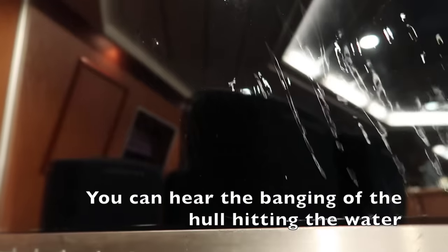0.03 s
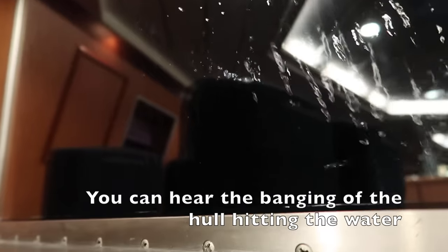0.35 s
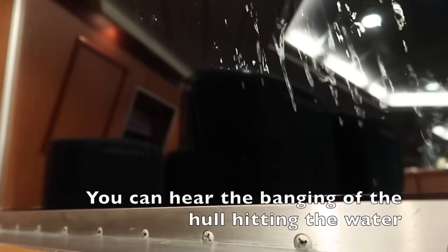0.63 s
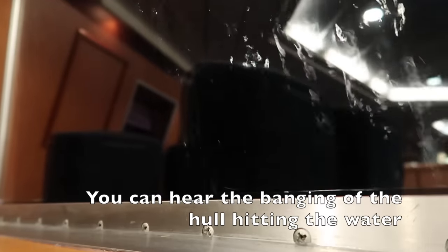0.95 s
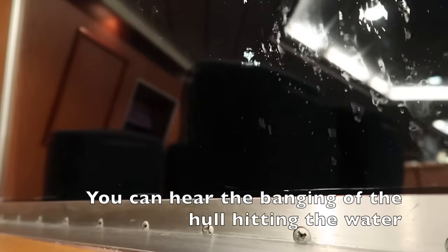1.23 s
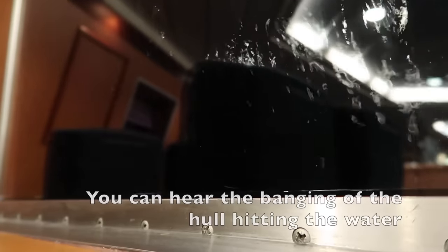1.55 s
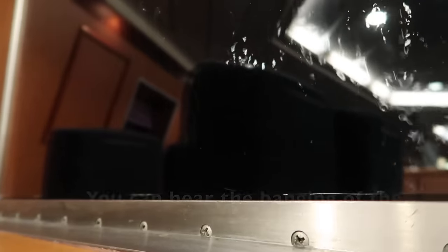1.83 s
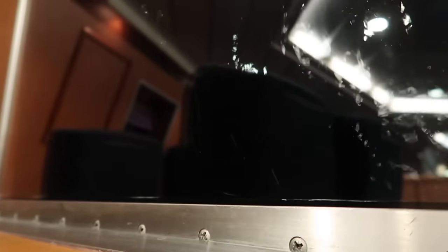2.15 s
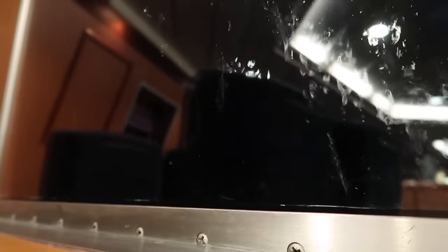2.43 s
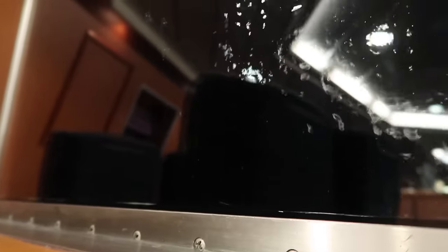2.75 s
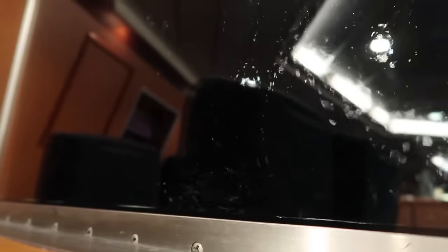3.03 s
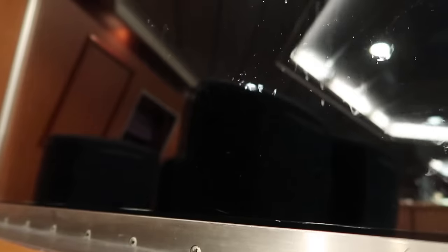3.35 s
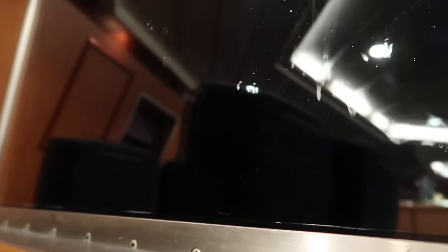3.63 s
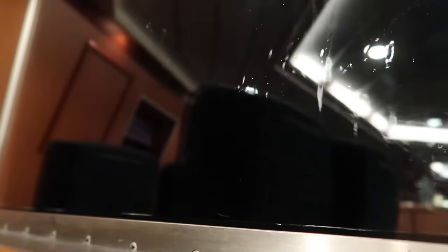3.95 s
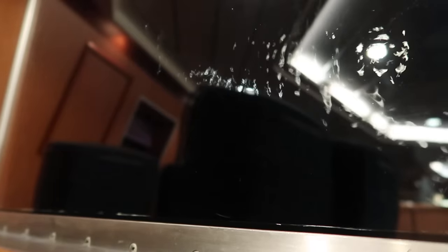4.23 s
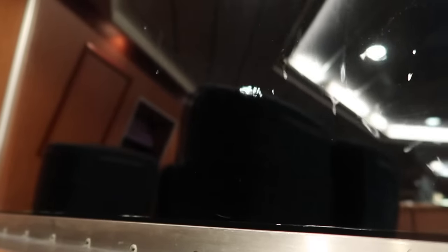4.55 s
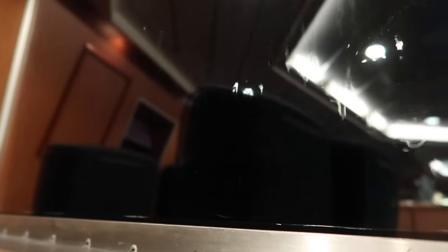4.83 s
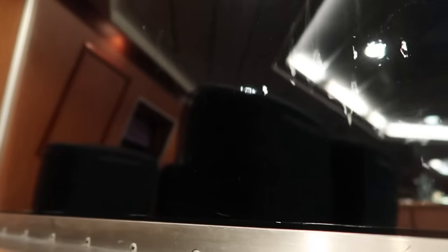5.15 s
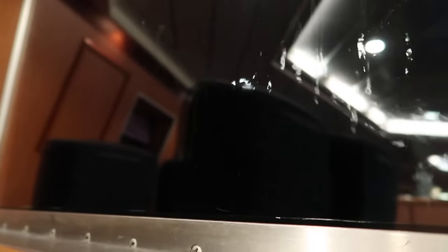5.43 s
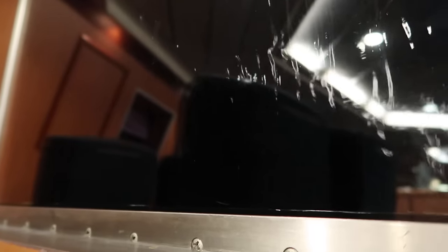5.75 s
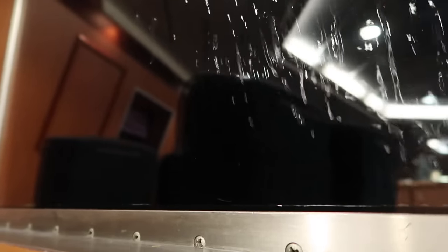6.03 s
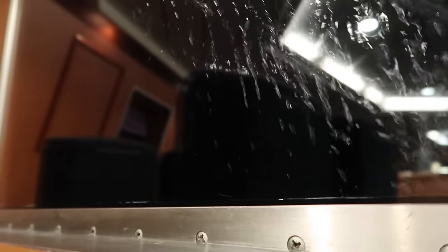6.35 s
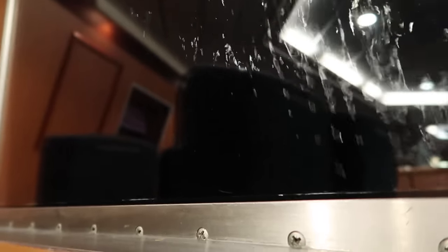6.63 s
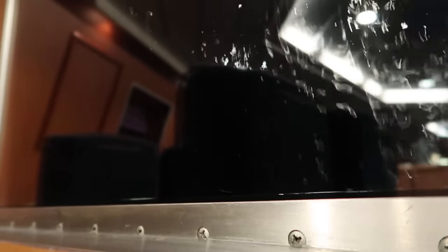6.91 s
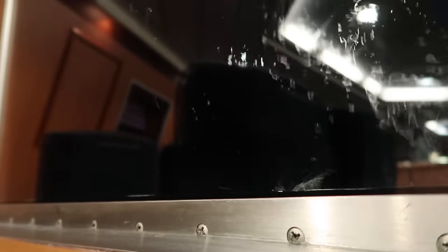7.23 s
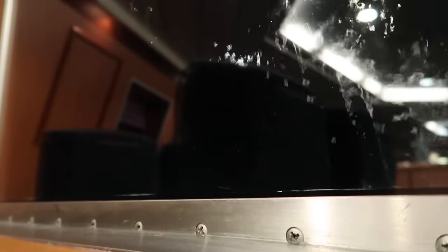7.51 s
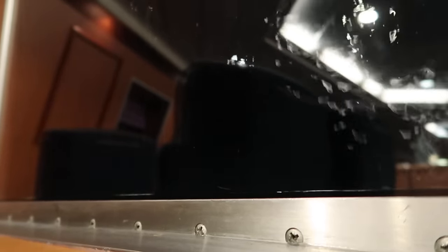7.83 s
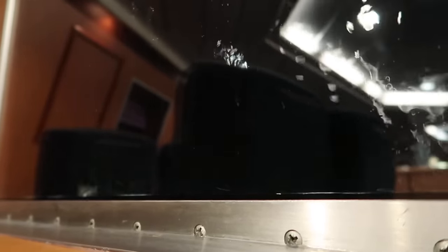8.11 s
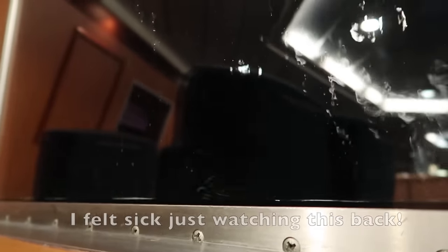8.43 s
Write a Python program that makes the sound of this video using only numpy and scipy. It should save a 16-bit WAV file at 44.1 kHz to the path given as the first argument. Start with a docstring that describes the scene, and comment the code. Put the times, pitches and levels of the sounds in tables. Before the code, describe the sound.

Inside a boat cabin in rough seas, the hull rumbles and booms heavily twice while panels tick and spray patters on glass.

```python
"""Boat cabin in a rough night sea

Turbulent water rushes along the hull and makes it rumble and drone. Twice the bow slams into a wave:
deep blows ring the hull's modes, the plating roars, the trim rattles, and the level steps up around
each slam. Joints tick, fittings knock and spray taps the glass over a hush and a faint high whine."""
import sys
import numpy as np
from scipy.fft import rfft, irfft, next_fast_len
from scipy.io import wavfile
from scipy.ndimage import uniform_filter1d, map_coordinates

SR = 44100
rng = np.random.default_rng(int(sys.argv[2]) if len(sys.argv) > 2 else 0)


def pcm_store(signal):
    """Save signal as 16-bit PCM."""
    levels = np.round(np.clip(np.atleast_2d(signal), -1, 1) * 32767)
    wavfile.write(sys.argv[1], SR, levels.astype(np.int16).T)


N = 373968
TIME = np.arange(N) / SR

# Waves that shake the hull. Each row: time in seconds, boom in dB, flexing in dB, rise in seconds.
WAVES = [(.57, -24.5, -18.5, 0.096), (.85, -34, -28.5, 0.079), (1.24, -28, -46.5, 0.066),
         (1.65, -29.5, -36.5, 0.23), (2.65, -32.5, -54.5, 0.15), (5.36, -35.5, -30, 0.12),
         (6.18, -29, -32.5, 0.079), (6.72, -20.5, -23.5, 0.021), (6.93, -33, -34, 0.11),
         (7.25, -23.5, -38, 0.045), (7.54, -21.5, -24.5, 0.2)]


def amp(db):
    """Amplitude grows tenfold with every 20 dB."""
    return np.exp(np.log(10) / 20 * np.asarray(db))


def together(*levels_db):
    """Incoherent sounds add in power; the sum is in dB."""
    return 10 * np.log10(sum(amp(2 * db) for db in levels_db))


def add(track, start_s, sound):
    """Superposition: a short sound adds to a track, both mono or both stereo."""
    part = track[..., round(start_s * SR):][..., :sound.shape[-1]]
    part += sound[..., :part.shape[-1]]


def wobble(rate):
    """Slow random modulation: a smooth curve through rate knots a second."""
    return map_coordinates(rng.standard_normal(int(N * rate / SR) + 4), [TIME * rate])


def filtered(x, response):
    """A linear filter multiplies the spectrum by its frequency response."""
    n = x.shape[-1]
    padded = next_fast_len(n + SR // 2)
    return irfft(rfft(x, padded) * response(np.fft.rfftfreq(padded, 1 / SR)), padded)[..., :n]


def shaped(points):
    """A spectral envelope joins (Hz, dB) points on a logarithmic frequency axis."""
    hz, db = np.transpose(points)
    return lambda f: amp(np.interp(np.log(f + 1), np.log(hz + 1), db))


def resonance(f, hz, width):
    """A damped oscillator responds most at its natural frequency, hz."""
    return 1j * f * width / (hz * hz - f * f + 1j * f * width)


def body(modes):
    """Modal summation: resonances add in alternating sign and roll off above the highest."""
    top_hz = 1.14 * max(hz for hz, _, _ in modes)

    def response(f):
        terms = ((-1) ** k * amp(db) * resonance(f, hz, width) for k, (hz, width, db) in enumerate(modes))
        return sum(terms) / np.sqrt(1 + (f / top_hz) ** 8)
    return response


def diffuse(response, width=None, size=N):
    """Partly coherent stereo noise, mid at rms 1; by default the bass is mono and the treble wide."""
    # The cabin's stereo width. Each row: frequency in Hz, side minus mid in dB.
    cabin_width = [(60, -103.5), (120, -78), (200, -62.5), (370, -21), (670, -22), (1230, -16.5),
                   (2240, -20), (4100, -5.5), (7500, 0), (12000, 11)]
    side_gain = shaped(width or cabin_width)
    mid = filtered(rng.standard_normal(size), response)
    side = filtered(rng.standard_normal(size), lambda f: response(f) * side_gain(f))
    return np.array([mid + side, mid - side]) / mid.std()


def steady(x, span_s):
    """Narrow-band noise swells by chance; dividing by its running rms evens out the slow swells."""
    window = int(span_s * SR)
    power = np.abs(uniform_filter1d(np.mean(x ** 2, axis=0), window))
    return x / np.sqrt(uniform_filter1d(power, window) + 1e-6)


def glide(x, ratio):
    """Reading a sound at a varying speed scales all its frequencies by that ratio."""
    return np.array([map_coordinates(ear, [np.cumsum(ratio)], mode="mirror") for ear in x])


def impacts(blows, modes, db_per_octave, attack_s):
    """Free vibration: each blow drives most the modes near its pitch, and they decay exponentially."""
    out, t = np.zeros(N), np.arange(SR) / SR
    hz, mode_db, t60 = np.transpose(modes)[:, :, None]
    rise = 1 - np.exp(-t / attack_s)
    for start_s, db, main_hz in blows:
        size, detune = rng.standard_normal((2, len(hz), 1))
        drive_db = mode_db + 1.7 * size - db_per_octave * np.abs(np.log2(hz / main_hz))
        rings = amp(drive_db - 60 * t / t60) * np.sin(2 * np.pi * hz * (1 + 0.012 * detune) * t)
        add(out, start_s, amp(db) * rise * rings.sum(0))
    return out


def tap(hz, life_cycles):
    """A small contact rings as a damped sinusoid, in its own phase at each ear."""
    t = np.arange(SR // 40) / SR
    phase = rng.random() + 0.11 * rng.standard_normal((2, 1))
    envelope = np.exp(-t * hz / life_cycles) * (1 - np.exp(-t * hz))
    return envelope * np.sin(2 * np.pi * (hz * t + phase))


def patter(bursts, hz, spread_octaves, spread_db, life_cycles, count):
    """Taps with exponentially distributed delays make bursts that thin out."""
    out = np.zeros((2, N))
    for start_s, db, mean_delay_s in bursts:
        delays = mean_delay_s * rng.exponential(size=count)
        scatter = np.clip(rng.standard_normal((count, 2)), -2, 2)
        for delay, (pitch, size) in zip(delays, scatter):
            contact = tap(hz * 2 ** (spread_octaves * pitch), life_cycles)
            add(out, start_s + delay, amp(db + spread_db * size) * contact)
    return out


def swell(peak_s, db, half_s):
    """A Gaussian swell is a parabola in dB."""
    return db - 20 / np.log(10) * np.minimum(((TIME - peak_s) / half_s) ** 2, 20)


def shudder(peak_s, db, rise_s, fade_db_per_s, linger_db, linger_db_per_s):
    """Double-slope decay, in dB: after a quick rise the shaking fades and a weaker part lingers."""
    age = np.maximum(TIME - peak_s, 0)
    rise_db = np.where(TIME < peak_s, swell(peak_s, db, rise_s), db)
    return rise_db + together(-fade_db_per_s * age, linger_db - linger_db_per_s * age)


def flow_level(usual_db, slope):
    """Flow noise grows with the water's speed, by slope dB for each dB of flow."""
    # Flow along the hull. Each row: time in seconds, strength about its usual value in dB.
    flow = [(0.0, -1.5), (0.7, -1.5), (1.1, 1), (1.4, 5), (1.85, 4), (2.15, 1), (3.0, 2.5), (3.5, 1.1),
            (4.0, 2), (4.65, -1.5), (5.15, -5), (5.75, -2), (6.4, 0.5), (7.15, -3), (7.55, -2), (8.05, 2),
            (8.48, 3.5)]
    return usual_db + slope * np.interp(TIME, *np.transpose(flow))


def strain_level(over_db=0, lag=0, stretch=1):
    """Response in dB to the strain of the bow digging in, delayed by lag half-lengths."""
    # Plunges of the bow. Each row: peak time in seconds, strain in dB, half-length in seconds.
    plunges = [(0.483, -34.5, 0.061), (1.543, -36.5, 0.078), (6.691, -27.5, 0.133), (6.898, -33, 0.052)]
    return together(*[swell(s + lag * half_s, db + over_db, stretch * half_s) for s, db, half_s in plunges])


def boom_level(idle_db=-33.5):
    """The shudders of the waves add in power to a constant rumble; the level is in dB."""
    shudders = [shudder(s, db, rise_s, fade_db_per_s=13.8, linger_db=-9.5, linger_db_per_s=5.4)
                for s, db, _, rise_s in WAVES]
    return together(idle_db, *shudders)


def spray_level():
    """Showers add in power to the spray that the flow throws up; the level is in dB."""
    # Showers on the windows. Each row: peak time in seconds, level in dB, half-length in seconds.
    showers = [(0.515, -56, 0.067), (0.794, -61, 0.21), (2.26, -63.5, 0.35), (2.833, -59, 0.17),
               (3.217, -64.5, 0.21), (4.04, -59.5, 0.098), (5.414, -64, 0.098), (6.073, -60, 0.37),
               (6.84, -58, 0.36), (7.26, -56.5, 0.055), (7.613, -56, 0.54), (8.06, -56, 0.21),
               (8.382, -51.5, 0.29)]
    return together(flow_level(-66.5, slope=0.52), *[swell(*shower) for shower in showers])


def hull_flexing(idle_db=-42.5):
    """Turbulent pressure bends the hull at very low frequencies, most after each wave."""
    # Bending spectrum. Each row: frequency in Hz, relative density in dB.
    spectrum = [(4, -42.5), (14, -2), (24, -4.5), (31, 1), (39, 3), (55, -27.5), (150, -120)]
    shudders = [shudder(s, db, rise_s, fade_db_per_s=43, linger_db=-19.5, linger_db_per_s=4)
                for s, _, db, rise_s in WAVES]
    return amp(together(idle_db, *shudders)) * steady(diffuse(shaped(spectrum)), span_s=0.11)


def cabin_boom(mode_hz=56, width_hz=6, mode_db=-5):
    """The hull booms into the cabin, whose lowest air mode picks out one deep note by resonance."""
    # Boom spectrum. Each row: frequency in Hz, relative density in dB.
    spectrum = [(8, -85), (22, -26.5), (32, -7), (44, 4), (55, 5.5), (68, 7), (92, 5), (115, 3.5),
                (135, -12.5), (190, -35), (400, -120)]
    boom = steady(diffuse(shaped(spectrum)), span_s=0.079)
    note = steady(diffuse(lambda f: resonance(f, mode_hz, width_hz) ** 2), span_s=0.6)
    return amp(boom_level()) * (boom + amp(mode_db) * note)


def plating():
    """Forced vibration: flow, strain and boom drive the plating into a roar."""
    # Modes of plating and cabin panels. Each row: frequency in Hz, bandwidth in Hz, gain in dB.
    modes = [(136.8, 23.4, -0.5), (165.8, 13.4, 2.5), (197, 13.3, -6), (220, 23.4, -4.5), (282, 35, -12),
             (314, 15.7, -11.5), (335.6, 7.3, -8), (381, 13.2, -14.5)]
    level_db = together(flow_level(-35, slope=0.74), strain_level(2.7, lag=0.49), boom_level() - 17)
    return amp(level_db) * steady(diffuse(body(modes)), span_s=0.18)


def hull_drone(wander=0.02):
    """The flow excites hollow resonances of the hull, which wander in pitch."""
    # Hollow modes. Each row: frequency in Hz, bandwidth in Hz, gain in dB.
    modes = [(284.3, 16.6, -1), (337.6, 11.8, -2.5), (378, 9.4, -3.5), (455.6, 14, -8.5), (478.3, 8.2, -3),
             (531, 100, -15)]
    drone = glide(diffuse(body(modes)), 1 + wander * wobble(2.5))
    return amp(flow_level(-46.5, slope=1.87)) * steady(drone, span_s=0.28)


def water(roof_db=4):
    """Modulated noise: wash churns along the hull; spray drums on the roof and hisses on the windows."""
    # Spectra of wash and spray. Each row: frequency in Hz, relative density in dB.
    wash_spectrum = [(60, -62.5), (220, -21), (340, -2.5), (415, 3.5), (475, 5.5), (550, -0.5), (590, 3.5),
                     (800, 2.5), (1000, -1), (1130, -2), (1320, -19), (1600, -15.5), (2050, -14),
                     (2600, -20), (2950, -38.5), (5000, -67.5)]
    spray_spectrum = [(200, -63), (700, -9.5), (1300, -1.5), (2100, 4.5), (2600, 2), (2950, -1),
                      (4500, -10.5), (7000, -19.5), (11000, -35.5), (14500, -44)]
    spray_db = spray_level()
    surge_db = strain_level(-14, lag=0.7, stretch=0.67)
    wash_db = together(flow_level(-49, slope=0.98), surge_db, spray_db + roof_db)
    churn = wobble(22)
    wash = amp(wash_db + 0.94 * churn + 1.2 * wobble(60)) * diffuse(shaped(wash_spectrum))
    spray = amp(spray_db + churn + 1.5 * wobble(70)) * diffuse(shaped(spray_spectrum))
    return wash + spray


def air(level_db=-59):
    """A diffuse field: an even hush arrives from all sides."""
    # Spectrum of the cabin air. Each row: frequency in Hz, relative density in dB.
    spectrum = [(70, -59.5), (125, -19), (180, -19.5), (300, 4.5), (500, 0), (1000, -7), (1400, -6),
                (2000, -11), (4000, -15), (7000, -21.5), (12000, -29.5), (14500, -40)]
    # Its stereo width. Each row: frequency in Hz, side minus mid in dB.
    width = [(200, -1.5), (3000, 2), (7500, 0.5), (12000, 6)]
    return amp(level_db) * diffuse(shaped(spectrum), width)


def whine(level_db=-82, tones_hz=(13000, 13025)):
    """Two close electronic tones waver and beat, a quarter cycle apart at the two ears."""
    phase = 2 * np.pi * np.outer(tones_hz, TIME) + 0.8 * np.array([wobble(35), wobble(35)])
    return amp(level_db + wobble(8)) * np.array([np.sin(phase).sum(0), np.cos(phase).sum(0)])


def drops(over_spray_db=-4, spread_db=11, centre_hz=2700, count=600):
    """Random impacts: drops tap the glass, each at its own pitch, harder in the showers."""
    out, spray_db = np.zeros((2, N)), spray_level()
    for place, size, pitch in rng.random((count, 3)):
        at, hz = int(place * (N - 1)), centre_hz * 2 ** (2 * pitch - 1)
        drop_db = spray_db[at] + over_spray_db + spread_db * size ** 4
        add(out, at / SR, amp(drop_db) * tap(hz, life_cycles=5))
    return out


def hull_groan(pitch_rise=0.07):
    """Narrow resonances sing as the bow digs in, their pitch rising with the strain."""
    # Groaning modes. Each row: nominal frequency in Hz, bandwidth in Hz, gain in dB.
    modes = [(187.3, 3.8, 9.5), (215, 47, 2), (306.2, 12.3, 6), (370, 21, -2.5), (429, 27, -8),
             (482, 26, -9.5), (587, 43, -11), (770, 90, -22)]
    strain = amp(strain_level())
    pitch = 1 + pitch_rise * (strain / strain.max() - 0.7)
    return strain * steady(glide(diffuse(body(modes)), pitch), span_s=0.29)


def wave_blows():
    """Impulse excitation: each blow of a wave on the bottom rings the hull's modes."""
    # Blows. Each row: start in seconds, relative level in dB, most strongly driven pitch in Hz.
    blows = [(.452, -8.5, 110), (.51, -16, 150), (0.538, -6.5, 75), (0.59, -12, 35), (0.62, -16, 50),
             (0.689, -14.5, 70), (0.794, -8.5, 58.2), (.88, -15, 64.5), (1.03, -16.5, 91),
             (4.255, -15, 112), (6.154, -15, 56.5), (6.529, -15, 75), (6.697, -4, 65), (6.735, -10, 69.4),
             (6.789, -8, 60), (6.831, -7, 65), (6.887, -6.5, 112.4), (7.007, -5.5, 90), (7.222, -6.5, 80.4)]
    # Hull modes. Each row: frequency in Hz, gain in dB, T60 in seconds.
    modes = [(16.5, 8, 0.25), (30, -11, .35), (55, -3.5, 0.49), (85.6, 6, 0.24), (119.8, -25.5, 0.34),
             (170.7, -5.5, 0.22), (189.5, -16, 0.98), (314, -40, 0.39)]
    return amp(-9) * impacts(blows, modes, db_per_octave=5, attack_s=0.0051)


def knocks_and_fizz(attack_s=0.0039):
    """Decaying noise bands: most are resonances of loose fittings that knock and squeak;
    the two above 10 kHz during the first slam are a faint, brief high fizz."""
    # Each row: start in seconds, level in dB, centre in Hz, bandwidth in Hz, T60 in seconds.
    bursts = [(0.464, -31, 870, 478, 0.065), (0.484, -55, 2530, 2520, 0.3),
              (0.487, -63.5, 10200, 2520, 0.11), (0.59, -65, 11000, 4000, .08),
              (0.522, -33, 810, 455, 0.062), (0.683, -47, 2200, 1200, .04), (1.304, -48.5, 1670, 900, 0.13),
              (2.624, -49.5, 4700, 2600, 0.034), (5.916, -55, 5000, 500, 0.091),
              (4.407, -58.5, 11400, 1190, 0.089), (4.41, -51.5, 6160, 3000, 0.13),
              (4.427, -49.5, 2880, 1200, .2), (4.436, -41.5, 1700, 600, 0.25), (4.432, -41, 945, 596, 0.24),
              (5.81, -49, 2290, 900, 0.11), (6.113, -31, 900, 220, 0.062), (6.119, -53, 5300, 200, 0.06),
              (6.755, -43.5, 2780, 800, 0.075), (6.837, -38, 2180, 904, 0.035)]
    out, t = np.zeros((2, N)), np.arange(SR // 2) / SR
    rise = 1 - np.exp(-t / attack_s)
    for start_s, db, hz, width, t60 in bursts:
        band = diffuse(lambda f: resonance(f, hz, width) ** 2, size=SR)[:, -len(t):]
        add(out, start_s, amp(db - 60 * t / t60) * rise * band)
    return out


def trim(room_db=-19, room_t60=0.45, ring_db=-23, chatter_db=-52, chatter_t60=0.04):
    """Panel joints snap and reverberate as the cabin works, chattering louder as the hull booms."""
    # Snaps. Each row: start in seconds, relative level in dB, T60 at the joint in seconds.
    snaps = [(0.4825, -46.5, .06), (0.494, -48.5, .05), (0.522, -44, 0.044), (0.538, -46, 0.035),
             (0.5896, -45, 0.079), (2.1, -43, 0.043), (2.257, -40, 0.046), (2.289, -39.5, .04),
             (2.3442, -38, 0.05), (2.4623, -46.5, 0.074), (2.6217, -34.5, 0.087), (2.8275, -48.5, 0.29),
             (3.628, -51, .15), (4.0338, -43.5, 0.11), (4.2976, -49.5, 0.81), (4.411, -40.5, 0.099),
             (5.335, -52, .05), (5.49, -53, .04), (5.715, -47, 0.045), (5.811, -51, .05),
             (5.91, -43.5, 0.19), (6.1202, -43.5, 0.097), (6.691, -42.5, 0.038), (6.726, -36, 0.027),
             (6.772, -36.5, 0.025), (6.792, -37, 0.03), (6.829, -34, 0.03), (6.87, -37.5, 0.036),
             (6.894, -43.5, 0.033), (6.9247, -44, .035), (7.02, -50, 0.078), (7.089, -52, 0.061),
             (7.2663, -42.5, 0.072), (7.296, -45.5, 0.056), (8.005, -43.5, 0.073), (8.014, -38, 0.053),
             (8.0227, -39.5, 0.049), (8.034, -47.5, .07), (8.3185, -45.5, .05), (8.329, -38, 0.039),
             (8.342, -36, .035), (8.354, -53, .05)]
    # Trim modes. Each row: frequency in Hz, gain in dB, T60 in seconds.
    modes = [(3540, -7.5, .06), (4980, 4.5, 0.15), (6460, -3, 0.06)]
    # Spectrum of a snap. Each row: frequency in Hz, relative density in dB.
    spectrum = [(1200, -18), (2800, 1), (3800, 4), (5200, -2), (7000, -5.5), (8300, -16), (11500, -22.5),
                (14500, -32)]
    t = np.arange(SR // 3) / SR
    rise = 1 - np.exp(-(t / 0.0023) ** 2)
    envelope = lambda joint_t60: rise * (amp(-60 * t / joint_t60) + amp(room_db - 60 * t / room_t60))
    hz, mode_db, t60 = np.transpose(modes)[:, :, None]
    energy, rings = np.zeros(N), np.zeros((2, N))
    for start_s, db, joint_t60 in snaps:
        add(energy, start_s, (amp(db - 10) * envelope(joint_t60)) ** 2)
        joint_hz = hz * (1 + 0.053 * rng.standard_normal(hz.shape))
        for ear in rings:
            ring = amp(mode_db - 60 * t / t60) * np.sin(2 * np.pi * (joint_hz * t + rng.random(hz.shape)))
            add(ear, start_s, amp(db + ring_db) * rise * ring.sum(0))
    boom_db = boom_level()
    for place, size in rng.random((90, 2)):
        at = int(place * (N - 1))
        chatter = amp(boom_db[at] + chatter_db + 10 * size ** 2) * envelope(chatter_t60)
        add(energy, at / SR, chatter ** 2)
    return rings + np.sqrt(energy) * diffuse(shaped(spectrum))


def rattles():
    """Repeated impacts: loose fittings jump and clatter under the blows."""
    # Clatters. Each row: start in seconds, level in dB, mean delay of the taps in seconds.
    bursts = [(.484, -47.5, .02), (.523, -43.5, 0.0073), (.538, -42, .013), (6.752, -45.5, .018),
              (6.793, -47, 0.013), (6.835, -42.5, .008), (6.871, -43, .014), (6.925, -47, .03)]
    return patter(bursts, hz=2010, spread_octaves=0.42, spread_db=2, life_cycles=2.4, count=28)


def splashes():
    """A splash breaks into heavy drops, each a damped impact on the glass."""
    # Splashes. Each row: start in seconds, level in dB, mean delay of the drops in seconds.
    bursts = [(2.735, -53, .04), (2.824, -46, .025), (3.018, -46.5, 0.01), (3.075, -57, .03),
              (3.16, -49, .02), (3.625, -49, 0.018), (5.375, -51, 0.024), (5.483, -53, .01),
              (5.916, -48, 0.035), (6.075, -58, 0.017)]
    return patter(bursts, hz=2380, spread_octaves=0.34, spread_db=4, life_cycles=3.1, count=20)


def woodwork():
    """A wooden panel bumps against its frame and rings in its damped modes."""
    # Bumps. Each row: start in seconds, level in dB, most strongly driven pitch in Hz.
    bumps = [(4.411, -40, 1300), (4.435, -51, 1300), (4.452, -46, 1750), (6.115, -37, 746)]
    # Panel modes. Each row: frequency in Hz, gain in dB, T60 in seconds.
    modes = [(600, 1, .27), (824, -8, 0.15), (878, 3, .2), (950, -3, 0.11), (1085, -3, 0.13),
             (1230, -7, .074), (1660, -9, 0.25), (1840, -5, .16)]
    return impacts(bumps, modes, db_per_octave=9, attack_s=0.0013)


def scene():
    """The sounds of hull, sea and cabin superpose."""
    hull = hull_flexing() + cabin_boom() + plating() + hull_drone() + hull_groan() + wave_blows()
    sea = water() + drops() + splashes()
    cabin = air() + trim() + rattles() + knocks_and_fizz() + woodwork() + whine()
    return hull + sea + cabin


def record(dry, step_db=7, dip_db=6, ceiling=0.98, top_hz=14300):
    """The level steps up around each slam, dipping beside each step; peaks saturate; the top is cut."""
    # Louder spans. Each row: start in seconds, end in seconds.
    spans = [(.2, 1.11), (6.48, 7.31)]
    loud = uniform_filter1d(sum(1.0 * ((TIME > start) & (TIME < end)) for start, end in spans), size=300)
    dip_times = [s for start, end in spans for s in (start - 0.007, end + 0.007)]
    dips = sum(np.exp(-((TIME - s) / 0.006) ** 2) for s in dip_times)
    stepped = dry * amp(step_db * loud - dip_db * dips)
    rounded = stepped / (1 + np.abs(stepped / ceiling) ** 8) ** (1 / 8)
    return filtered(rounded, lambda hz: hz < top_hz)


dry = scene()
out = record(dry)
pcm_store(out)
```